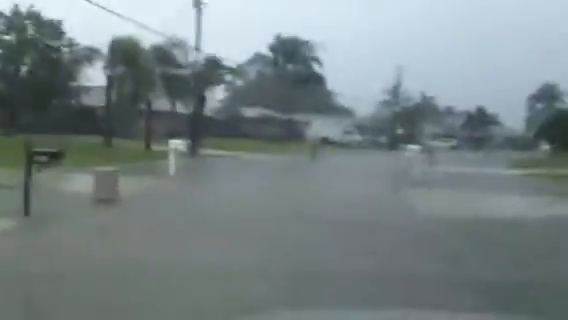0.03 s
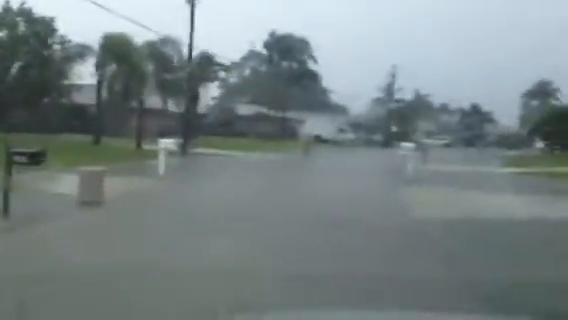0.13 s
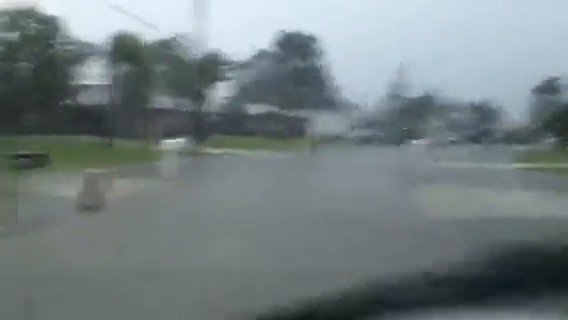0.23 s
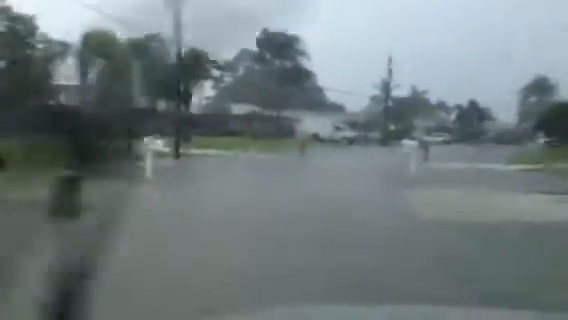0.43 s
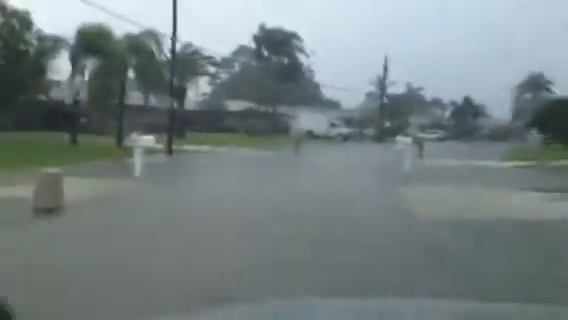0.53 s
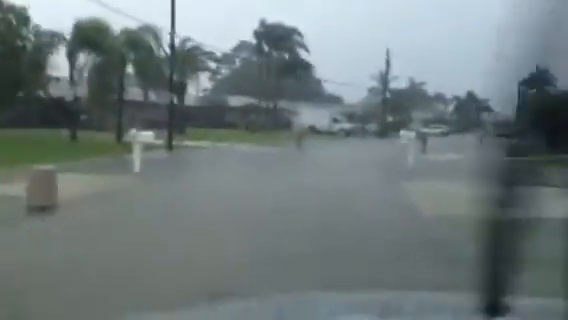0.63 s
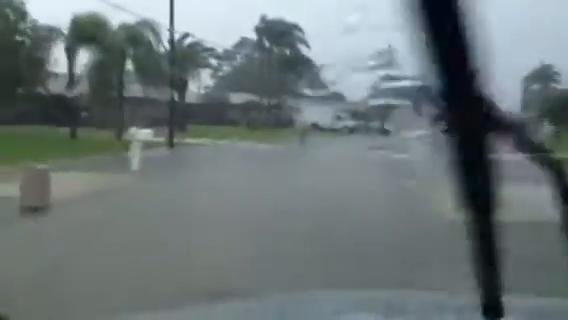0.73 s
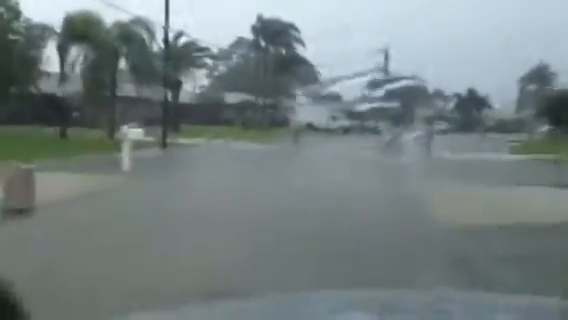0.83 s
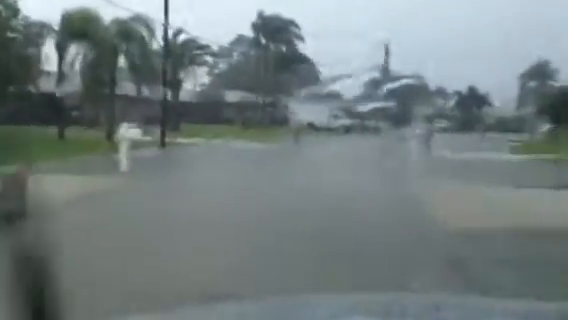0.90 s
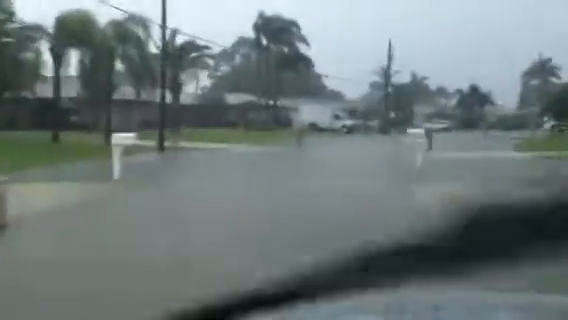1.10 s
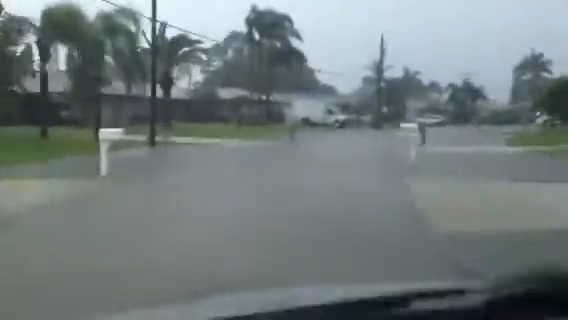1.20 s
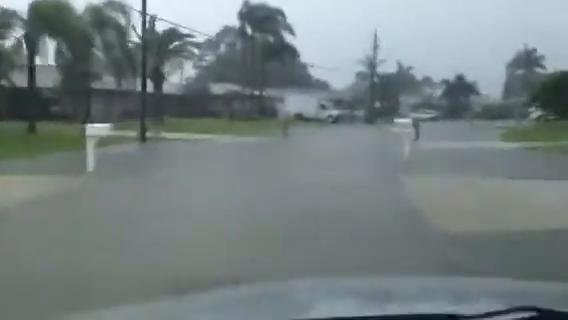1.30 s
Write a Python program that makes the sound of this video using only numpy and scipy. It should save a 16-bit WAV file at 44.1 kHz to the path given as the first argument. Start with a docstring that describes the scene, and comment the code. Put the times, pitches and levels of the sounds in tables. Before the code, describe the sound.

A windshield wiper starts with a soft thump, judders across wet glass with a falling rubbery groan and raspy chirps, then returns quietly and thumps again. Rain hisses over a low wind rumble, heard from inside the car.

```python
"""Rain hisses on the glass over a low rumble of wind and water, heard from inside a car in a storm.
The wiper thumps out of its rest and swishes water up the windshield. Its rubber sticks and slips,
juddering the glass into a rough, falling groan with raspy chirps and a wet sizzle on top.
It glides back almost silently, flinging a fine spray, and lands with a second soft thump."""
import sys
import numpy as np
from scipy import signal
from scipy.fft import rfft, irfft, next_fast_len
from scipy.io import wavfile
from scipy.ndimage import map_coordinates

SR = 44100
rng = np.random.default_rng(int(sys.argv[2]) if len(sys.argv) > 2 else 0)


def generate_wav(sig):
    """Save sig (samples, or channels by samples) to the path in sys.argv[1] as 16-bit PCM at SR."""
    pcm = np.round(np.clip(np.atleast_2d(sig).T, -1, 1) * 32767).astype(np.int16)
    wavfile.write(sys.argv[1], SR, pcm)


N = 59535

# dark bed of wind and water around the car (frequency [Hz], gain [dB])
RUMBLE_EQ = [(20, -31.5), (40, -32), (80, -19), (110, -5.5), (190, 0), (270, -6.5), (340, -8), (460, -6.5),
             (550, -9), (620, -17), (1000, -20), (1500, -35), (3000, -46.5), (8000, -71)]
# rain on the glass (frequency [Hz], gain [dB])
RAIN_EQ = [(200, -20.5), (900, 4), (1500, 2), (2100, -1), (3100, 0.5), (4500, -5.5), (5300, -10),
           (7500, -11.5), (10000, -18), (15000, -19)]
# near drops and spits of water (time [s], level [dB])
DROP_HITS = [(.085, -42), (.4465, -40), (.46, -40), (.5062, -31), (1.213, -42)]
# bright snap of water on the glass (frequency [Hz], gain [dB])
DROP_EQ = [(300, 4), (2000, -2.5), (3500, -1.5), (5200, -1.5), (7500, 1), (10000, -10.5), (15000, -31)]
# water pushed ahead of the blade (time [s], level [dB])
SWISH_ENVELOPE = [(0, -44.5), (.04, -48), (.085, -46), (.13, -46), (.17, -49), (.3, -45.5), (.52, -45.5),
                  (.57, -54.5), (.8, -55), (1.19, -63), (1.225, -49), (1.28, -62)]
# tone of that wash (frequency [Hz], gain [dB])
SWISH_EQ = [(200, -11), (700, 7.5), (1800, -0.5), (3200, -1), (4600, -5), (5400, -10), (8300, -11.5),
            (10000, -20.5), (15000, -26.5)]
# fine spray flung from the returning blade (time [s], level [dB])
SPRAY_ENVELOPE = [(.8, -79), (.9, -64.5), (.98, -66), (1.03, -74.5), (1.203, -64.5), (1.213, -59.5),
                  (1.25, -59), (1.28, -78)]
# airy tone of that spray (frequency [Hz], gain [dB])
SPRAY_EQ = [(1000, -29), (5000, -8), (7800, -1), (10000, -9.5), (13000, -9.5), (15000, -9)]
# gathered water sizzling under the rubber (time [s], level [dB])
SIZZLE_ENVELOPE = [(.3, -73), (.39, -61), (.455, -52.5), (.475, -68.5), (.49, -68), (.535, -57),
                   (.552, -71)]
# the wiper arm sets off, lands and rebounds (time [s], level [dB], pitch [Hz])
ARM_THUMPS = [(.058, -30, 177), (1.22, -26.5, 173.2), (1.252, -44, 174), (1.325, -37.5, 179)]
# body of a thump (ratio to pitch [1], gain [dB])
ARM_MODES = [(.68, -6), (1.001, 4.5), (1.2, 3.5)]
# the rubber catches with a short chirp (time [s], level [dB], pitch [Hz])
RUBBER_CATCHES = [(.203, -31.5, 626), (.32, -27.5, 724), (.429, -28.5, 875), (.515, -33, 836)]
# partials of a chirp (ratio to pitch [1], gain [dB])
RUBBER_MODES = [(0.998, 4.5), (1.36, -10), (1.72, -8.5)]
# the blade's first bending mode, which leads the judder (time [s], pitch [Hz])
FIRST_MODE_PITCH = [(.17, 292), (.2, 300.6), (.23, 277.5), (.27, 262.8), (.295, 253.2), (.31, 211),
                    (.35, 213.1), (.4, 205), (.46, 198.6), (.52, 193.2), (.57, 179)]
# a second bending mode that beats against it (time [s], pitch [Hz])
SECOND_MODE_PITCH = [(.17, 345), (.27, 305.5), (.31, 294.5), (.36, 261.5), (.42, 245.5), (.46, 249.5),
                     (.487, 312), (.52, 277.5), (.55, 269.5)]
# blend of the second mode (time [s], level against the first [dB])
SECOND_MODE_MIX = [(.17, -14), (.27, -9), (.31, -4), (.38, -10), (.45, -15), (.49, -0.5), (.515, -13.5),
                   (.56, -10.5)]
# low tone of the swinging blade (time [s], level [dB])
SWING_ENVELOPE = [(.15, -65), (.19, -29.5), (.21, -27.5), (.226, -23), (.27, -19), (.293, -18),
                  (.332, -21.5), (.348, -18.5), (.45, -15.5), (.472, -18.5), (.488, -28.5), (.508, -14),
                  (.535, -20.5), (.555, -23), (.58, -53)]
# grit of the rubber slipping on the glass (time [s], level [dB])
SLIP_ENVELOPE = [(.17, -76), (.205, -34), (.27, -35), (.325, -33), (.4, -29), (.47, -29.5), (.535, -26.5),
                 (.55, -49), (.58, -79)]
# the windshield's broad answer to a slip (frequency [Hz], gain [dB])
GLASS_EQ = [(40, -62), (130, -42.5), (200, -35), (280, 0), (380, 6), (490, 1.5), (570, -11.5), (780, -11),
            (1200, -17), (1550, -27.5), (2100, -31.5), (3000, -28.5), (5000, -48.5)]
# its sharper resonances (frequency [Hz], width [Hz], gain [dB])
GLASS_MODES = [(706, 43, -5), (900, 58, -10.5), (1124, 53, -14.5)]
# scrape of sliding rubber (frequency [Hz], gain [dB])
SCRAPE_EQ = [(300, -58), (1200, 25), (3000, 1.5), (5200, -5.5), (7500, 4), (10000, -43), (15000, -22)]


def amp(db):
    """Decibels to gain."""
    return 10 ** (np.asarray(db) / 20)


def unit(x):
    """Scale to rms 1."""
    return x / np.sqrt(np.mean(x ** 2) + 1e-20)


def curve(points):
    """(time [s], value) points to one value per sample."""
    return np.interp(np.arange(N) / SR, *np.transpose(points))


def envelope(points):
    """Gain from (time [s], level [dB]) points, silent outside them."""
    t = np.arange(N) / SR
    return amp(curve(points)) * (t > points[0][0]) * (t < points[-1][0])


def wobble(rate_hz):
    """A smooth random modulator with rate_hz knots a second."""
    return map_coordinates(rng.standard_normal(2048), [np.arange(N) * rate_hz / SR], mode="mirror")


def coloured(x, eq, modes=()):
    """Shape x with a causal EQ curve plus resonant peaks."""
    size = 2 * next_fast_len(N)
    f = np.fft.rfftfreq(size, 1 / SR)
    hz, db = np.transpose(eq)
    gain = amp(np.interp(np.log(f + 1), np.log(hz + 1), db))
    cepstrum = irfft(np.log(gain))
    cepstrum[1:size // 2] *= 2  # fold to minimum phase: nothing rings ahead of a hit
    cepstrum[size // 2 + 1:] = 0
    body = np.exp(rfft(cepstrum))
    peaks = sum(amp(peak_db) * 1j * f * width / (centre ** 2 - f ** 2 + 1j * f * width)
                for centre, width, peak_db in modes)
    return irfft(rfft(x, size) * body * (1 + peaks / np.abs(body)), size)[:N]


def noise(eq):
    """Coloured noise of rms 1."""
    return unit(coloured(rng.standard_normal(N), eq))


def rings(hits, modes, attack_s, t60_s):
    """Each hit sets the modes ringing; they swell and die away."""
    out = np.zeros(N)
    for start, db, hz in hits:
        t = np.maximum(np.arange(N) / SR - start, 0)
        ring = sum(amp(mode_db) * np.sin(2 * np.pi * (hz * ratio * t + rng.random()))
                   for ratio, mode_db in modes)
        out += ring * amp(db - 60 * t / t60_s) * (1 - np.exp(-t / attack_s))
    return out


def cabin(x, t60_s=.06, wet_db=-7):
    """Add the short, padded echo of the car's interior."""
    t = np.arange(SR // 4) / SR
    tail = rng.standard_normal(len(t)) * amp(-60 * t / t60_s)
    return x + amp(wet_db) * signal.fftconvolve(x, tail / np.linalg.norm(tail))[:N]


def storm(rumble_db=-40, hiss_db=-54.5, flutter_db=1.3, patter_db=-61, drops_per_s=1100, spread_db=5):
    """The bed: a steady rumble of wind and water, the hiss of far rain and a nearer patter."""
    rumble = noise(RUMBLE_EQ) * amp(rumble_db)
    hiss = noise(RAIN_EQ) * amp(hiss_db + flutter_db * wobble(rate_hz=45))
    sizes = amp(spread_db * np.minimum(rng.exponential(size=N), 4))
    polarity = rng.choice([-1, 1], N)
    landings = rng.random(N) < drops_per_s / SR
    patter = unit(coloured(sizes * polarity * landings, RAIN_EQ))
    return rumble + hiss + amp(patter_db) * patter


def near_drops(t60_s=.011):
    """Single drops snap on the glass, each a tiny burst of noise."""
    t = np.arange(N) / SR
    bursts = sum((t >= start) * amp(db - 60 * np.abs(t - start) / t60_s) for start, db in DROP_HITS)
    return .5 * bursts * noise(DROP_EQ)


def swish():
    """The blade shoves water up the glass and flings a fine spray on its way back."""
    wash = amp(curve(SWISH_ENVELOPE)) * noise(SWISH_EQ)
    spray = envelope(SPRAY_ENVELOPE) * noise(SPRAY_EQ)
    return wash + spray


def sizzle(pops_per_s=600, spread_db=6, t60_s=.0044):
    """Tiny bursts of water, squeezed out under the blade, crowd into a wet crackle."""
    t = np.arange(SR // 50) / SR
    pops = (rng.random(N) < pops_per_s / SR) * amp(spread_db * rng.standard_normal(N))
    bursts = signal.fftconvolve(pops, amp(-60 * t / t60_s))[:N]
    return envelope(SIZZLE_ENVELOPE) * unit(bursts * noise(DROP_EQ))


def arm_thumps():
    """The arm rings low and soft as it sets off, lands and rebounds."""
    return rings(ARM_THUMPS, ARM_MODES, attack_s=.0097, t60_s=.11)


def rubber_chirps(rasp_db=1):
    """The rubber catches and rings briefly; a fast flutter in level gives it rasp."""
    chirps = rings(RUBBER_CATCHES, RUBBER_MODES, attack_s=.0069, t60_s=.11)
    return chirps * unit(amp(rasp_db * wobble(rate_hz=300)))


def blade_mode(pitch, jitter_rad=.18, flutter_db=2, rate_hz=110):
    """One bending mode of the blade: a gliding complex tone, unsteady in phase and level."""
    angle = 2 * np.pi * np.cumsum(curve(pitch)) / SR + jitter_rad * wobble(rate_hz)
    return np.exp(1j * angle) * amp(flutter_db * wobble(rate_hz))


def slip_knocks(motion, phase, scatter_s=.00009, spread_db=2):
    """Once a cycle the rubber lets go and knocks the glass, harder when the blade swings wider."""
    slips = np.flatnonzero(np.diff(np.floor(phase / (2 * np.pi))))
    late, size = rng.standard_normal((len(slips), 2)).T
    onsets = np.clip(slips + late * scatter_s * SR, 0, N - 1).astype(int)
    knocks = np.bincount(onsets, np.abs(motion[onsets]) * amp(spread_db * size), N)
    return unit(knocks - knocks.mean())


def groan(pulse_depth=.4, rub_db=-2.5, scrape_db=-23, soften_hz=4000):
    """Two modes of the blade beat together; their swing makes the rubber knock, rub and scrape."""
    motion = blade_mode(FIRST_MODE_PITCH) + amp(curve(SECOND_MODE_MIX)) * blade_mode(SECOND_MODE_PITCH)
    phase = np.maximum.accumulate(np.unwrap(np.angle(motion)))  # forward only: one slip a cycle
    sliding = 1 + pulse_depth * np.cos(phase)
    scrape = unit(noise(SCRAPE_EQ) * sliding)
    rub = unit(rng.standard_normal(N) * sliding)
    force = slip_knocks(motion, phase) + amp(rub_db) * rub
    soft_force = signal.sosfilt(signal.butter(2, soften_hz, fs=SR, output="sos"), force)
    glass = unit(coloured(soft_force, GLASS_EQ, GLASS_MODES))
    tone = envelope(SWING_ENVELOPE) * unit(motion.real)
    grit = envelope(SLIP_ENVELOPE) * (glass + amp(scrape_db) * scrape)
    return tone + grit


def wiper(low_cut_hz=90):
    """Groan, chirps and thumps, with the deep bass removed by a steep low cut."""
    low_cut = signal.butter(4, low_cut_hz, "high", fs=SR, output="sos")
    return signal.sosfilt(low_cut, groan() + rubber_chirps() + arm_thumps())


def scene():
    """Storm and wiper from the front seat, in mono, with cabin echo on the drops and sizzle."""
    return (storm() + swish() + wiper() + cabin(near_drops() + sizzle()))[None]


def record(dry, top_hz=15350):
    """A brick-wall high cut takes the very top off the mix."""
    size = next_fast_len(N + SR // 2)
    passband = np.fft.rfftfreq(size, 1 / SR) < top_hz
    return irfft(rfft(dry, size) * passband, size)[..., :N]


dry = scene()
out = record(dry)
generate_wav(out)
```